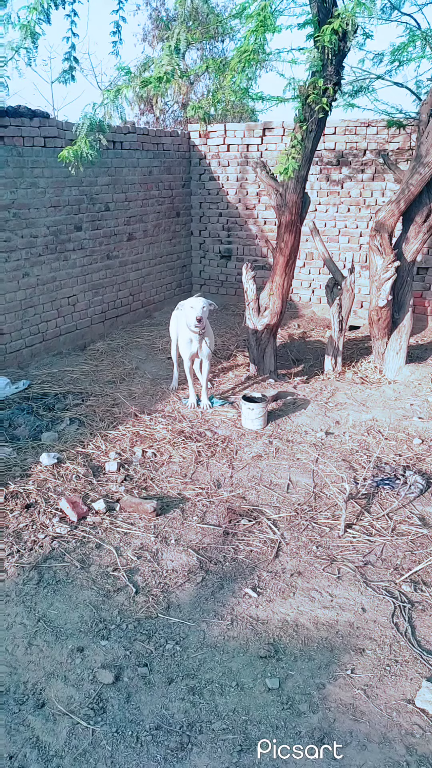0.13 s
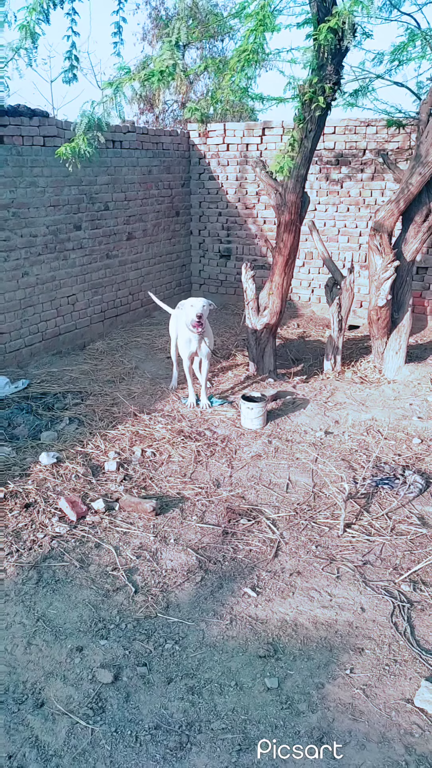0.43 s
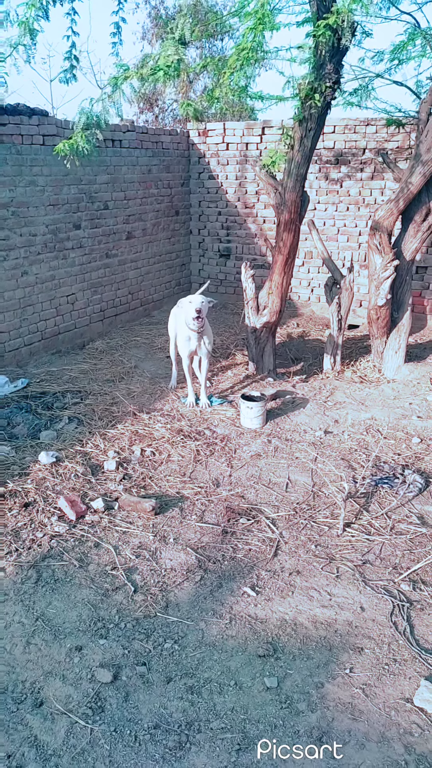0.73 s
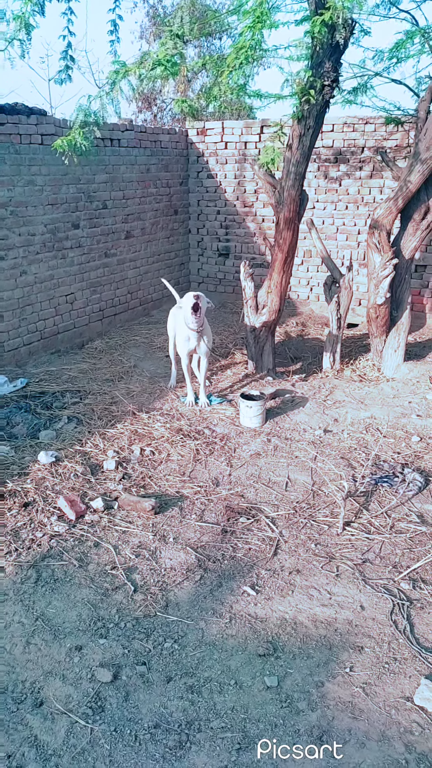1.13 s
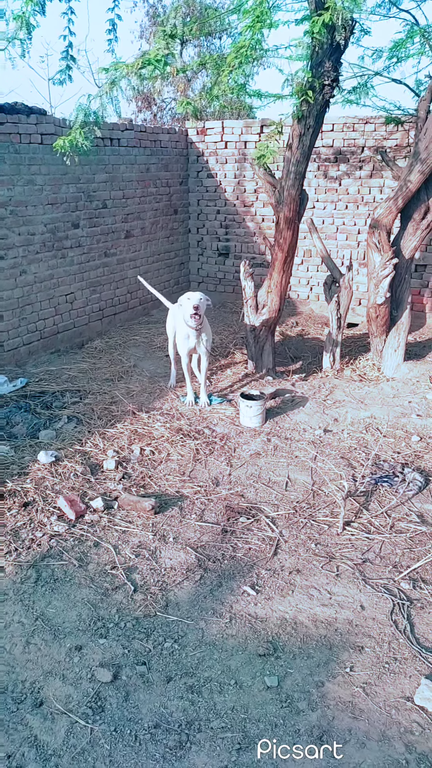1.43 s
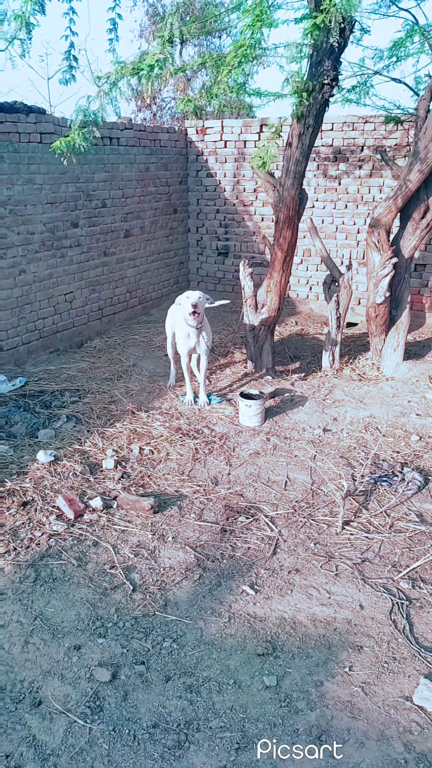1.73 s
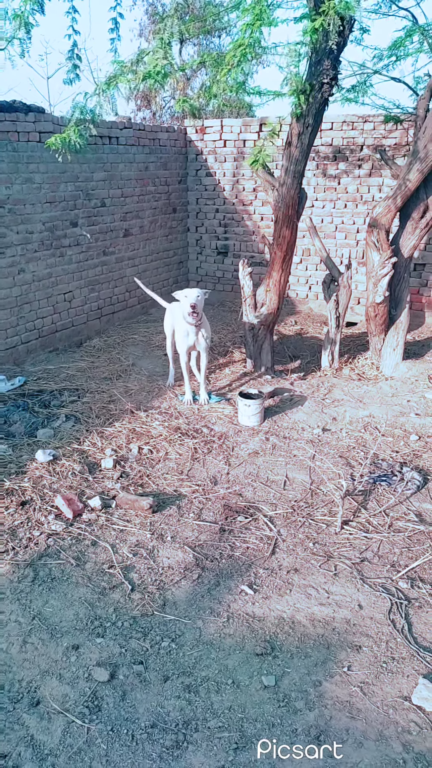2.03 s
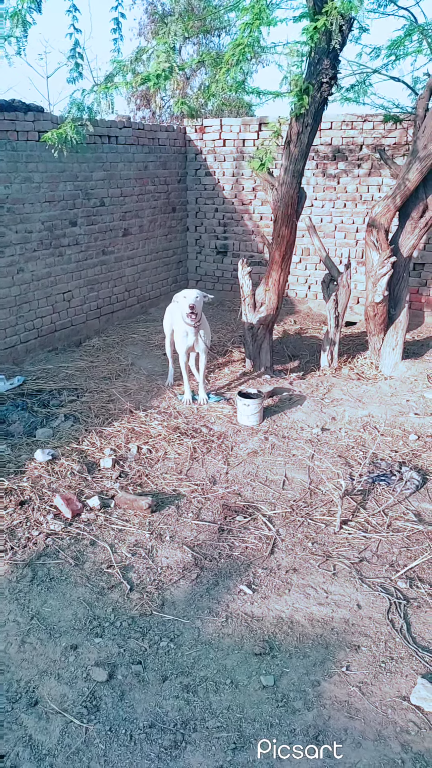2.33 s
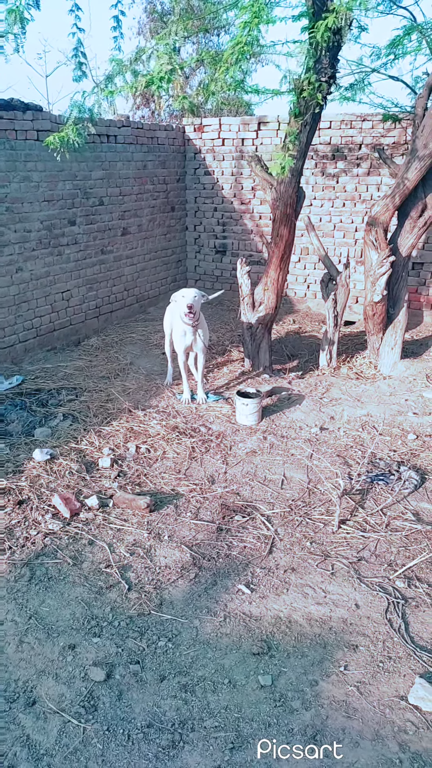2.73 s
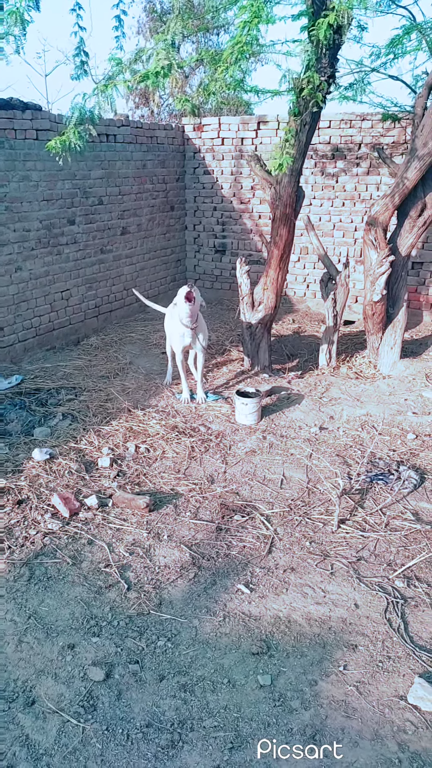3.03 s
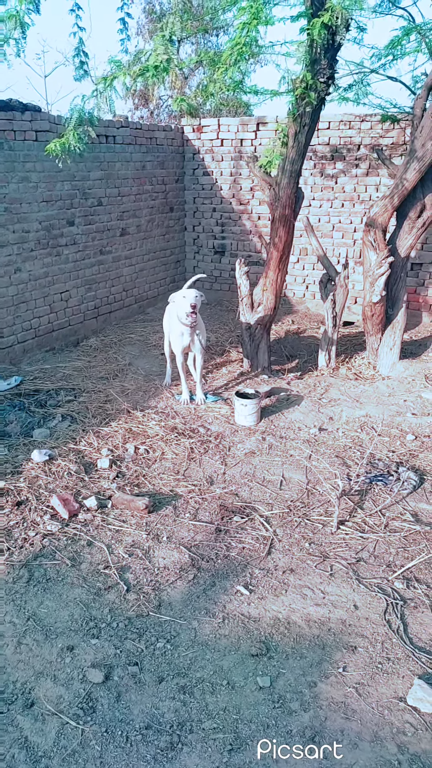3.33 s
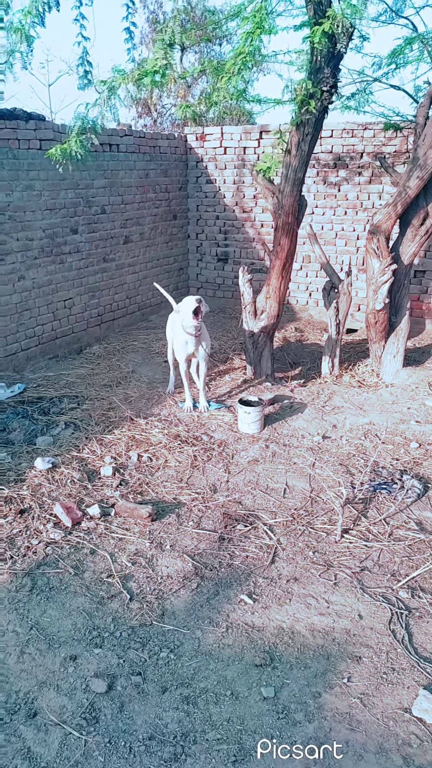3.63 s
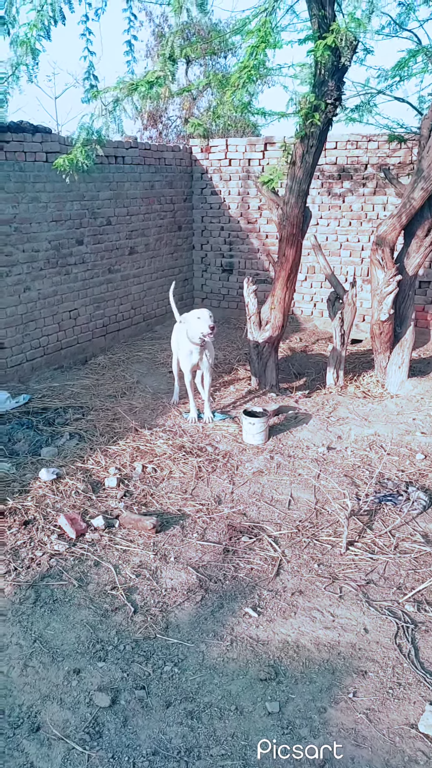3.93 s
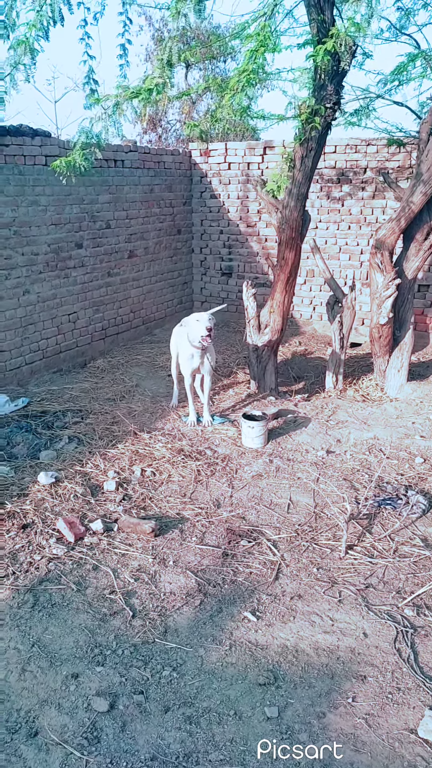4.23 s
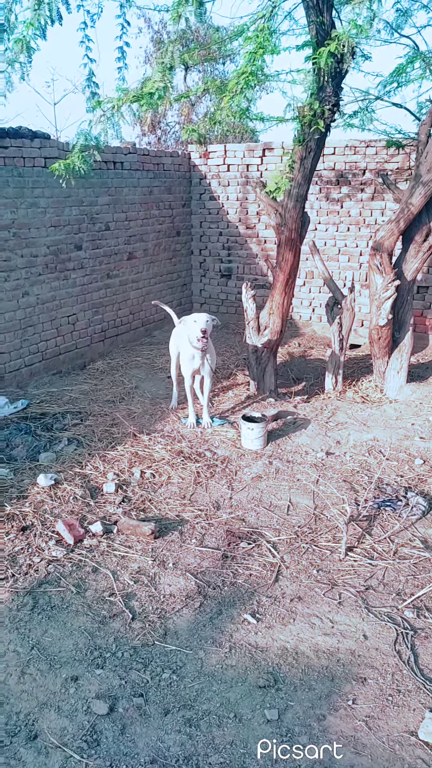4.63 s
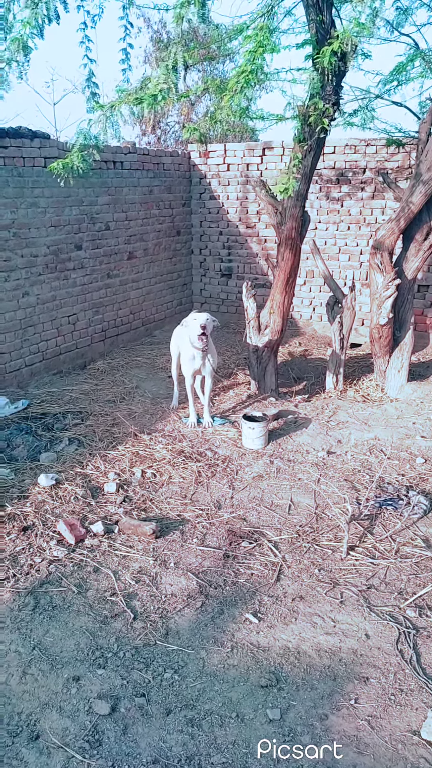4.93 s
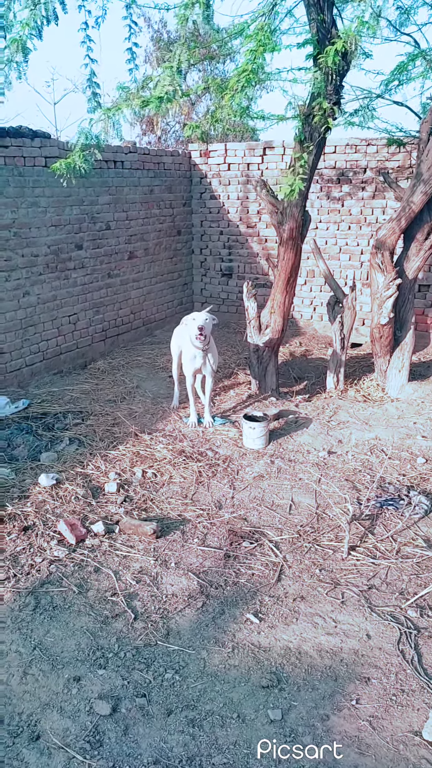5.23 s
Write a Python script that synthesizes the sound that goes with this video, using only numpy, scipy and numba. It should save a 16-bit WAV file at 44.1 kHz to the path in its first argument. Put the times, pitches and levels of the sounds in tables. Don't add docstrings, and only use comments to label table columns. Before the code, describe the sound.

A large dog barks sharply again and again in a brick-walled yard, with ringing echoes, raspy crow caws, small birds and light wind.

```python
import sys
import numpy as np
from scipy import signal
from scipy.fft import rfft, irfft
from scipy.io import wavfile
from scipy.ndimage import uniform_filter1d
from numba import njit

SR = 44100
rng = np.random.default_rng(int(sys.argv[2]) if len(sys.argv) > 2 else 0)


def master(y):
    cut = np.clip(np.atleast_2d(y).T, -1, 1)
    pcm = np.round(cut * 32767)
    wavfile.write(sys.argv[1], SR, pcm.astype(np.int16))


def magnitude_from_level(level_db):
    exponent = np.asarray(level_db, float) / 20
    return 10 ** exponent


N = 370440
TIME = np.arange(N) / SR

# (f/Hz, level per Hz/dB)
HUSH = [(200, -37), (300, -2), (600, -0.5), (1400, -3.5), (2200, -0.5), (3000, -10), (6500, -19),
        (7500, -28.5), (12000, -25.5), (15500, -16.5)]
# (f/Hz, level/dB)
HUM = [(172, -53.5), (368, -50.5)]

# (t/s, growl length/s, jaws shut after/s, top fold f/Hz, level/dB)
BARKS = [(1.208, 0.02, 0.094, 449.4, -6), (1.862, 0.024, .11, 451.5, -7), (3.05, 0.036, 0.12, 477, -6.5),
         (3.689, 0.017, 0.13, 440.4, -8), (4.345, 0.038, 0.14, 461.7, -7.5), (5.034, .027, 0.13, 460, -5.5),
         (5.618, 0.033, 0.095, 448.6, -3.5), (6.182, .015, 0.082, 436.1, -7),
         (6.736, .022, .068, 437.8, -5.5), (7.38, 0.022, 0.11, 461.3, -6.5),
         (7.978, 0.03, 0.086, 441.4, -9.5)]
# (fold f/Hz as they part, mouth f/Hz and throat ring level/dB before they shut, run-out/s)
JAWS = [(274.6, 980, 7, 0.043), (267.5, 1100, -12.5, 0.035), (295.3, 1100, -3, 0.034),
        (307.5, 1136, -18.5, 0.023), (304.7, 1120, -24, 0.022), (267.8, 956, -11, 0.039),
        (291.4, 900, 11, 0.037), (290.3, 1160, 8.5, 0.066), (255, 1040, 0.5, 0.0654), (301, 530, 6, 0.051),
        (275, 630, 10, 0.0668)]
BARK_ROUGH = [.45, .4, .75, .38, .3, .8, .35, .55, .65, .25, .55]
# (share of its time, share of pitch rise, level/dB, mouth f/Hz, throat ring level/dB)
CLIMB = [(0, 0.078, -7, 1130, 6.5), (.33, .55, -6.5, 1130, 2.5), (.7, .98, -3, 1270, -5.5)]
# (level/dB, mouth f/Hz, throat ring level/dB)
ONSET = (-14, 1140, 9.7)
SHUT = (-2, 958, 6.4)
SLACK = (-5.5, 980, 3.2)
# (t/s, length/s, first fold f/Hz, level/dB, swell level/dB)
GROWLS = [(1.195, 0.021, 123, -37, 4), (1.848, .02, 129.6, -37.5, 15), (3.665, 0.021, 86.4, -23, -16),
          (4.272, 0.078, 83.5, -41.5, 8), (6.169, 0.012, 122, -30.5, 30), (7.302, 0.079, 62.5, -36, 28)]
GROWL_ROUGH = [.4, .4, .3, .4, .4, .15]
# (t/s, fold f/Hz, level/dB, mouth f/Hz, throat ring level/dB)
GRUMBLES = [
    [(.02, 281, -28.5, 1200, 59), (.08, 433, 1.5, 1495, -14), (.15, 267, -41, 950, 5)],
    [(.556, 280.5, -16, 1470, -55), (.645, 275.3, -24, 833, -2.5), (.69, 152.4, -12.5, 1030, 13)],
    [(.554, 767.4, -21.5, 1640, -5.5), (.58, 818, -15.5, 1450, -4), (.655, 771, -12, 1554, -18)],
    [(2.468, 82.6, -36.5, 904, 16), (2.54, 94.7, -34.5, 937, 5.5), (2.56, 108.8, -29, 1475, -11),
     (2.62, 109.3, -37.5, 1410, -11), (2.65, 92, -48, 1300, -2)],
]
GRUMBLE_ROUGH = [.4, .6, .32, .3]
# (f/Hz, width/Hz, level/dB)
SNOUT = [(1495, 166, 8.5), (2006, 247, 4.5), (2290, 110, -27.5)]
# (f/Hz, width/Hz, level/dB)
BREATH = [(3530, 900, -2), (4600, 333, 3.5), (6330, 650, -0.5), (9900, 250, -49), (12600, 12000, -17)]

# (t/s, length/s, from f/Hz, to f/Hz, level/dB)
WHISTLES = [(.39, .12, 1930, 2030, -39), (.33, .24, 810, 800, -41), (.36, .22, 3240, 3200, -47),
            (.33, .18, 4480, 4470, -42), (.2, .19, 4760, 4470, -32), (.25, .11, 5230, 4920, -43),
            (1.457, .082, 6000, 3900, -47), (2.278, .032, 6900, 5700, -47), (2.32, .052, 6100, 3700, -42),
            (3.452, .02, 4830, 3460, -36), (4.942, .03, 2800, 3530, -42), (.905, .049, 3900, 3800, -37),
            (7.903, .039, 4100, 5600, -50), (7.923, .06, 2630, 3400, -40), (7.935, .045, 3500, 4100, -38),
            (8.347, .04, 3070, 3400, -43), (8.351, .04, 3750, 3980, -41)]
# (t/s, chirps, spacing/s, from f/Hz, level/dB)
TRILLS = [(2.258, 6, .024, 2700, -45), (5.99, 4, .027, 2700, -40), (6.5, 6, .039, 2550, -40),
          (6.55, 4, .039, 3400, -48), (7.218, 4, .038, 2750, -40)]
# (f/Hz, level per Hz/dB)
RUMBLE = [(12, -77), (20, -51), (57, -11.5), (125, -1), (282, -7.5), (331, -15.5), (380, -19), (400, -18),
          (520, -60.5), (880, -120)]
# (t/s, half length/s, level/dB, left minus right level/dB)
GUSTS = [(0.215, 0.05, -36, 14), (0.903, 0.049, -41.5, 20), (1.076, 0.066, -40, -5), (1.535, 0.051, -41, 0),
         (2.55, 0.06, -38, 1), (2.94, 0.068, -54, 27), (4.686, .12, -34, 7.5), (4.953, 0.17, -45, -5),
         (5.395, .1, -36.5, -2), (5.918, 0.027, -21, -15), (6.52, 0.15, -34, -7.5), (7.206, 0.45, -42.5, 4),
         (7.505, 0.24, -47.5, -14), (8.204, 0.067, -47, -4)]
# (t/s, peak level/dB, f/Hz, left minus right level/dB)
PUFFS = [(1.047, -20.5, 150, -9), (1.205, -29, 210, -5), (1.299, -27, 87, 8), (1.397, -25, 211, -0.5),
         (1.87, -25, 255, -3), (4.456, -31, 124, 18), (4.804, -20, 125, -12), (5.711, -22, 128.4, 16),
         (5.912, -57, 123, -30), (5.985, -35, 105, -31), (6.387, -37, 145, -14), (6.483, -21, 135, -17),
         (6.62, -27, 142, 13), (7.254, -20.5, 123, -13)]
# (t/s, f/Hz, level/dB)
WHINE = [
    (.3, 486.5, -48),
    (.39, 485, -31.5),
    (.46, 524, -27),
    (.48, 586, -30),
    (.49, 790, -38),
    (.52, 892, -21),
    (.555, 800, -33),
]
# (t/s, length/s, level/dB)
CAWS = [
    (2.881, 0.21, -26.5),
    (3.882, 0.26, -19.5),
    (4.116, 0.24, -24),
    (4.74, 0.25, -23.5),
    (5.802, 0.24, -29.5),
]
# (f/Hz, width/Hz, level/dB)
BEAK = [(965, 130, -2.5), (1650, 490, 8.5), (1944, 554, 11), (2141, 222, 11), (3670, 700, -9),
        (6760, 475, -3), (9020, 380, -11.5), (11900, 1150, -23.5)]

# (delay t/s, level/dB)
ECHOES = [(.004, -7), (.009, -9), (.016, -9), (.024, -11), (.035, -12), (.048, -14), (.11, -18)]
# (delay t/s, level/dB)
SCATTER = [(0, -10.5), (.03, 4.5), (.15, -5), (.27, -13.5), (.4, -28), (.6, -38.5), (1.2, -83)]
# (f/Hz, level/dB)
BRICK = [(300, 12.5), (500, -3.5), (700, -10.5), (920, 5), (1150, -7.5), (1500, -6), (2200, -5.5),
         (3200, -7), (7000, -11), (9000, -15), (16000, -21)]
# (f/Hz, phase/rad)
PORT_LEAD = [(0, 0), (600, -0.1), (860, 0.8), (2240, 0.4), (4220, 3.2), (4740, 3.9), (5340, 7.8),
             (7150, 9.5), (9910, 18.7), (11600, 19.1), (12200, 21.6), (13100, 22.1), (13800, 24.8),
             (15200, 25.2)]
# (f/Hz, left minus right level/dB)
PORT_TILT = [(60, 0.5), (110, 0.0), (200, -1.5), (380, 3.0), (700, 1.0), (1290, -3), (2380, -6),
             (4400, -3.5), (8120, -2.5), (15000, 4.0)]
# (f/Hz, share of time empty)
HOLES = [(2700, 0), (3400, .12), (6600, .1), (7200, .4), (10000, .5), (11500, .35), (13500, .6),
         (15500, .9)]


def level(x, db):
    return x * magnitude_from_level(db) / np.sqrt(np.mean(x ** 2))


def colour(x, points):
    hz, db = np.transpose(points)
    f = np.fft.rfftfreq(x.shape[-1], 1 / SR)
    gain = magnitude_from_level(np.interp(np.log(f + 1), np.log(hz), db))
    return irfft(rfft(x) * gain, x.shape[-1])


@njit
def svf(x, hz, width):
    y, band, low = np.empty(len(x)), 0., 0.
    for i in range(len(x)):
        g, k = np.tan(np.pi * hz[i] / SR), width / hz[i]
        v = (band + g * (x[i] - low)) / (1 + g * (g + k))
        band, low, y[i] = 2 * v - band, low + 2 * g * v, k * v
    return y


@njit
def fire(hz, rough, chance, jitter, shimmer):
    pulses, phase, k = np.zeros(len(hz) + 1), .9, 0
    for i in range(len(hz)):
        step = hz[i] * np.exp(jitter * rough[i] * chance[k, 0]) / SR
        phase += step
        if phase >= 1:
            phase, k = phase - 1, k + 1
            size = np.exp(shimmer * rough[i] * chance[k, 1]) * np.sqrt(SR / hz[i])
            pulses[i] += size * phase / step
            pulses[i + 1] += size * (1 - phase / step)
    return pulses[:-1]


@njit
def limiter(loud, top, attack, release):
    gain, e = np.empty(len(loud)), 0.
    for i in range(len(loud)):
        e += (loud[i] - e) * (attack if loud[i] > e else release)
        gain[i] = min(1., top / (e + 1e-9))
    return gain


def modes(x, table):
    out = 0
    for k, (hz, width, db) in enumerate(table):
        out = out + (-1) ** k * magnitude_from_level(db) * svf(x, np.full(len(x), 1. * hz), 1. * width)
    return out


def play(rows, fade):
    s, *columns = np.transpose(rows)
    a = int(s[0] * SR)
    t = TIME[a:int(s[-1] * SR)]
    edge = np.clip(np.minimum(t - s[0], (s[-1] - t) / 2) / fade, 0, 1)
    return a, edge, [np.interp(t, s, c) for c in columns]


def walk(rate):
    k = int(SR / rate)
    held = np.repeat(rng.standard_normal(N // k + 1), k)
    return 1.3 * uniform_filter1d(uniform_filter1d(held, k), k)[:N]


def village():
    hush = level(colour(rng.standard_normal((2, N)), HUSH) * magnitude_from_level(walk(3)), -45.5)
    hum = sum(magnitude_from_level(db + 2 * walk(12)) * np.sin(2 * np.pi * hz * TIME) for hz, db in HUM)
    return hush + hum


def growl(s, length, hz, db, swell_db):
    rise_per_s, mouth_hz, throat_db = 9, 880, 8
    return [(s + u * length, hz * np.exp(rise_per_s * u * length), db + swell_db * u ** 2, mouth_hz, throat_db)
            for u in np.linspace(0, 1, num=4)]


def bark(s, growl_s, shut_s, top_hz, db, open_hz, late_mouth_hz, late_ring_db, slack_s):
    rows = [(s, .94 * open_hz, db + ONSET[0], *ONSET[1:])]
    for u, rise, d, mouth_hz, ring_db in CLIMB + [(0.99, 1, -1.5, late_mouth_hz, late_ring_db)]:
        t = s + growl_s + u * (shut_s - growl_s)
        rows.append((t, open_hz + rise * (top_hz - open_hz), db + d, mouth_hz, ring_db))
    over = max(shut_s - .112, 0)
    closed = s + shut_s + .004 + .9 * over
    left_db = db - 300 * over
    rows.append((closed, .545 * top_hz, left_db + SHUT[0], *SHUT[1:]))
    rows.append((closed + slack_s, .525 * top_hz, left_db + SLACK[0], *SLACK[1:]))
    return rows


def dog():
    throat_hz, throat_width_hz, mouth_width_hz = 499, 123., 309.
    out = np.zeros(N)
    sputter = walk(40)
    barks = [bark(*row, *jaw) for row, jaw in zip(BARKS, JAWS)]
    calls = barks + [growl(*row) for row in GROWLS] + GRUMBLES
    for rows, hoarse in zip(calls, BARK_ROUGH + GROWL_ROUGH + GRUMBLE_ROUGH):
        a, edge, (hz, db, mouth_hz, throat_db) = play(rows, fade=.008)
        rough = hoarse * np.clip(400 / hz, .8, 1.05) ** 1.5
        folds = fire(hz, rough, rng.standard_normal((400, 2)), .065, .4)
        air = rng.standard_normal(len(hz))
        drive = folds + .4 * rough * air
        turbulent = drive + (.35 + rough) * np.sqrt(hoarse / .2) * air

        still = np.clip(2 * hz, throat_hz, 1.092 * throat_hz)
        throat = svf(svf(drive, still, throat_width_hz), still, 1.54 * throat_width_hz)
        mouth = svf(svf(drive, mouth_hz, mouth_width_hz), mouth_hz, 4.4 * mouth_width_hz)
        snout = level(modes(turbulent, SNOUT), -2)
        front = level(snout - level(mouth, 0), 0)
        ring = magnitude_from_level(throat_db)
        voice = (ring * level(throat, 0) + front) / np.sqrt(1 + ring ** 2)

        rush = magnitude_from_level(13.5 * np.log2(np.clip(hz, 310, 460) / 350))
        breath = rush * level(modes(air + 0.029 * folds, BREATH), -24.5)
        breath = breath * magnitude_from_level(2.01 * sputter[a:a + len(hz)])
        out[a:a + len(hz)] += edge * magnitude_from_level(db + 7) * (voice + breath)
    chest_cut = signal.butter(4, 560, "high", fs=SR, output="sos")
    return signal.sosfilt(chest_cut, out)


def songbirds():
    out = np.zeros(N + SR)
    chirps = []
    for s, count, gap, lo, db in TRILLS:
        for k in range(int(count)):
            chirps.append((s + k * gap, .75 * gap, lo, 1.32 * lo, db))
    flutter = walk(90)
    for s, length, lo, hi, db in WHISTLES + chirps:
        a = int(s * SR)
        u = np.linspace(0, 1, int(length * SR))
        reach, strength = rng.standard_normal(2)
        hz = lo + (hi - lo) * (1 + .06 * reach) * u
        tone = np.sin(2 * np.pi * np.cumsum(hz) / SR)
        waver = magnitude_from_level(strength - 2 + 3 * np.resize(flutter[a:], len(u)))
        out[a:a + len(u)] += magnitude_from_level(db) * waver * np.sin(np.pi * u) * tone
    return out[:N]


def wind():
    side = np.array([[.5], [-.5]])
    flicker = magnitude_from_level(4.5 * np.array([walk(18), walk(18)]))
    out = level(flicker * colour(rng.standard_normal((2, N)), RUMBLE), 1.63)
    calm = magnitude_from_level(-44.5)
    out *= calm + sum(magnitude_from_level(db + side * pan) * np.exp(-((TIME - s) / half) ** 2) for s, half, db, pan in GUSTS)
    u = np.arange(2200) / SR
    for s, db, hz, pan in PUFFS:
        puff = np.sin(2 * np.pi * hz * u) * u / 0.012 * np.exp(1 - u / 0.0076)
        out[:, int(s * SR):int(s * SR) + len(u)] += magnitude_from_level(db + side * pan) * puff
    return out


def whine():
    out = np.zeros(N)
    a, edge, (hz, db) = play(WHINE, fade=0.0057)
    waver_db = 3.9 * walk(65.5)[:len(hz)]
    out[a:a + len(hz)] = edge * magnitude_from_level(db + waver_db) * np.sin(2 * np.pi * np.cumsum(hz) / SR)
    return out


def crow():
    pitch_hz, sag, peak = 364, .035, 0.46
    out = np.zeros(N)
    for s, length, db in CAWS:
        rows = [(s, db - 10, pitch_hz * (1 + sag)),
                (s + peak * length, db, pitch_hz),
                (s + length, db - 9.5, pitch_hz * (1 - sag))]
        a, edge, (db, hz) = play(rows, fade=.007)
        pulses = fire(hz, np.ones(len(hz)), rng.standard_normal((400, 2)), 0.0324, 0.13)
        rattle = 1 + .4 * np.sin(2 * np.pi * 79 * TIME[:len(hz)])
        rasp = rattle * (pulses + 1.1 * rng.standard_normal(len(hz)))
        out[a:a + len(hz)] += edge * magnitude_from_level(db) * level(modes(rasp, BEAK), 0.68)
    return out


def yard(x):
    t = TIME[:int(1.2 * SR)]
    shared, own = rng.standard_normal(len(t)), rng.standard_normal((2, len(t)))
    own = colour(own, [(300, 14.5), (700, -8), (2500, 7), (16000, -13.5)])
    response = (shared + own) * magnitude_from_level(np.interp(t, *np.transpose(SCATTER)) - 48.5)
    for k, (delay, db) in enumerate(ECHOES):
        side = np.array([1, -1]) * (-1) ** k
        response[[0, 1], int(delay * SR) - 9 * side] += magnitude_from_level(db + 3 * side)
    wet = signal.fftconvolve(colour(response, BRICK), x[None], axes=1)[:, :N]
    skipped = (TIME > 5.39) & (TIME < BARKS[6][0])
    return wet * magnitude_from_level(-8 * skipped)


def ports(x):
    f = np.fft.rfftfreq(N, 1 / SR)
    lead = np.interp(f, *np.transpose(PORT_LEAD))
    tilt_hz, tilt_db = np.transpose(PORT_TILT)
    tilt = np.interp(np.log(f + 1), np.log(tilt_hz), tilt_db)
    half = magnitude_from_level(tilt / 2) * np.exp(.5j * lead)
    return irfft(rfft(x) * np.array([half, 1 / half]), N)


def treble_holes(x):
    f, t, cells = signal.stft(x, SR, nperseg=2048, noverlap=1536)
    band = (f // 150).astype(int)
    chance = uniform_filter1d(rng.standard_normal((band.max() + 1, len(t))), size=6, axis=1)
    rank = chance.argsort(axis=1).argsort(axis=1) / len(t)
    empty = rank[band] < np.interp(f, *np.transpose(HOLES))[:, None]
    return signal.istft(cells * ~empty, SR, nperseg=2048, noverlap=1536)[1][:, :N]


def scene():
    animals = dog() + crow()
    birds = songbirds() + whine()
    direct = ports(animals) + magnitude_from_level(-2) * birds
    return direct + yard(animals + magnitude_from_level(-10) * birds) + wind() + village()


def band_limit(x):
    return signal.sosfilt(signal.butter(12, 15710, fs=SR, output="sos"), x)


def record(dry):
    gain = limiter(np.abs(dry).max(axis=0), .7, 1 / (.001 * SR), 1 / (.08 * SR))
    held = dry * np.roll(gain, -60)
    rounded = .85 * np.tanh((1.15 * held + .03 * held ** 2) / .85)
    started = rounded * np.clip((TIME - .241) / .004, 0, 1)
    cut = signal.sosfilt(signal.ellip(8, .2, 70, 15350, fs=SR, output="sos"), started)
    return band_limit(treble_holes(cut))


dry = scene()
out = record(dry)
master(out)
```